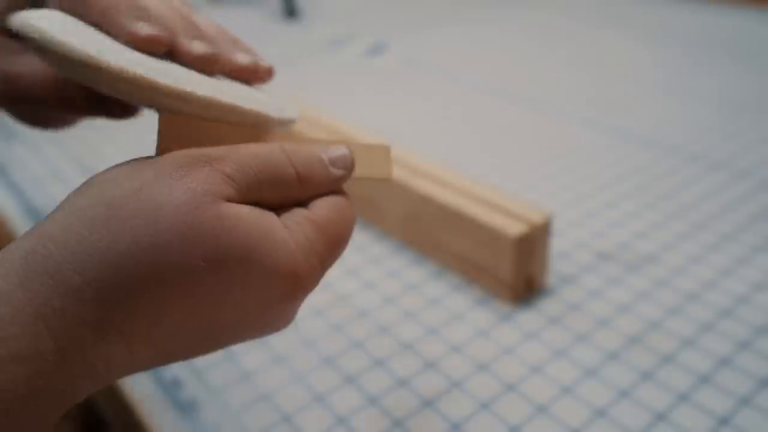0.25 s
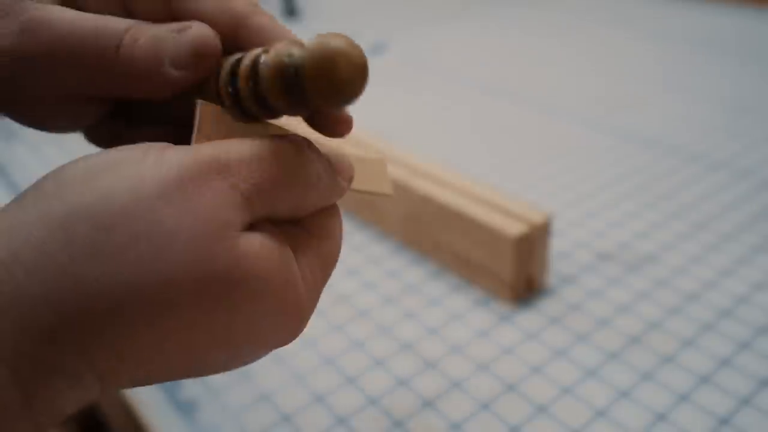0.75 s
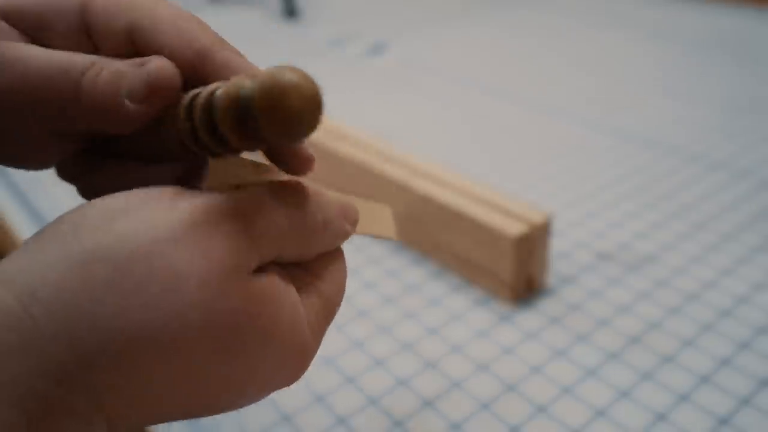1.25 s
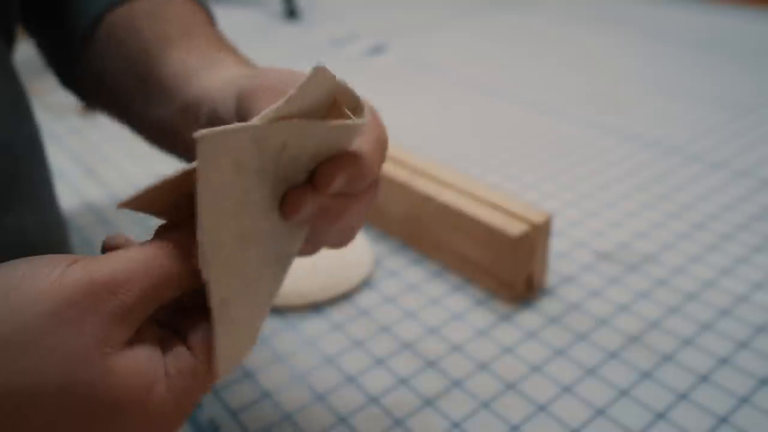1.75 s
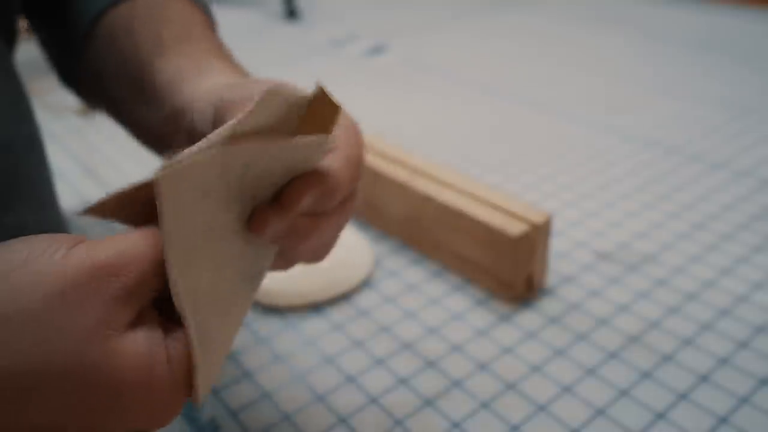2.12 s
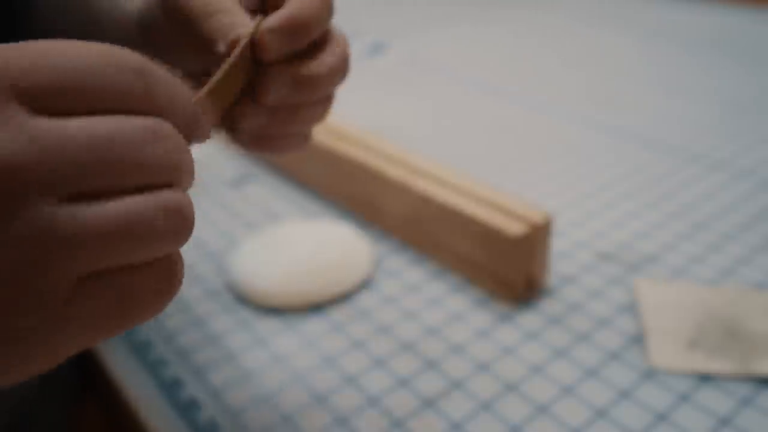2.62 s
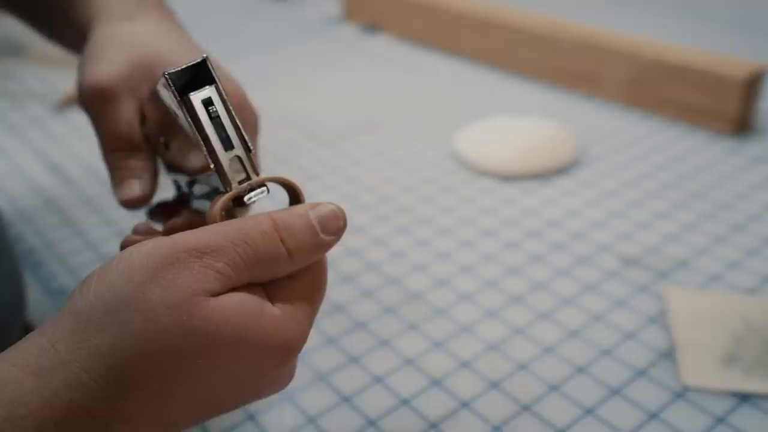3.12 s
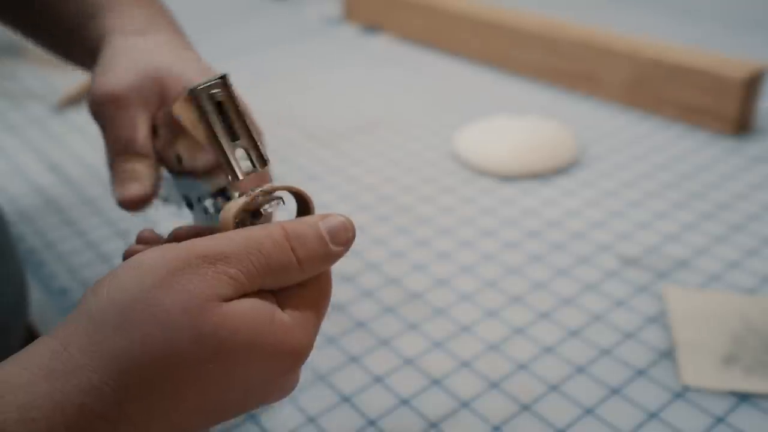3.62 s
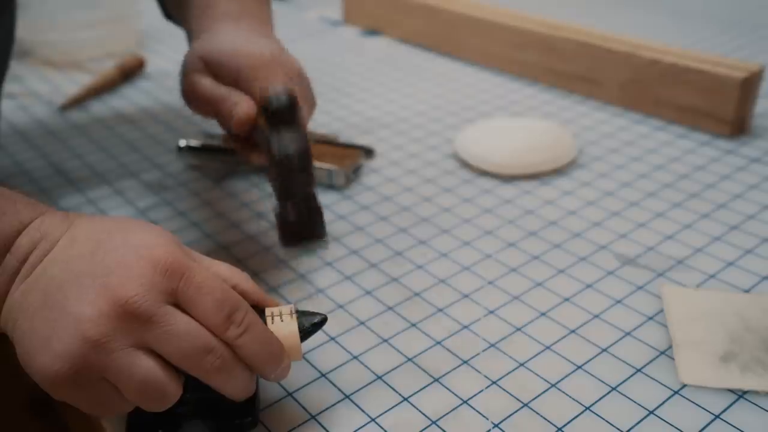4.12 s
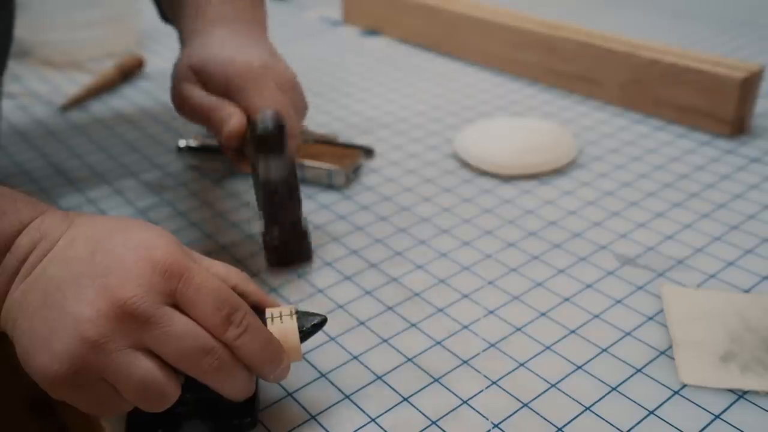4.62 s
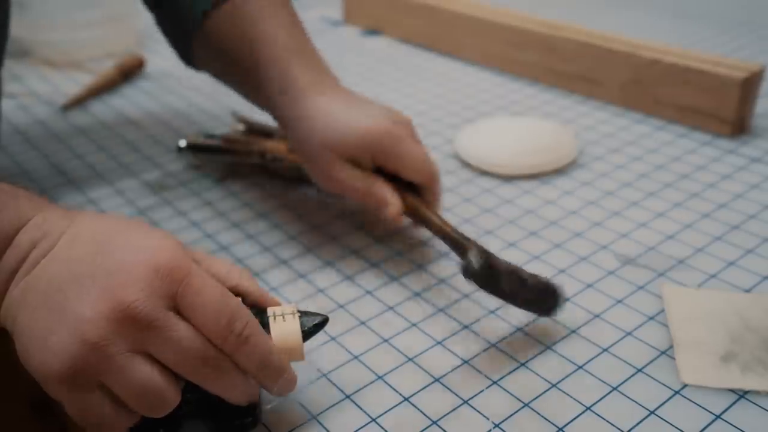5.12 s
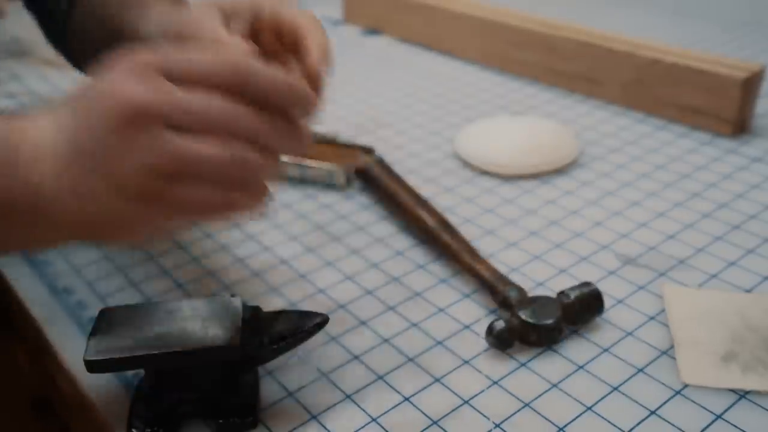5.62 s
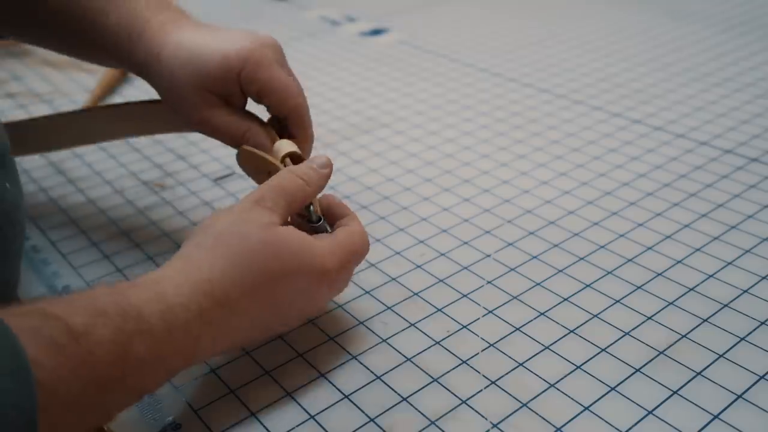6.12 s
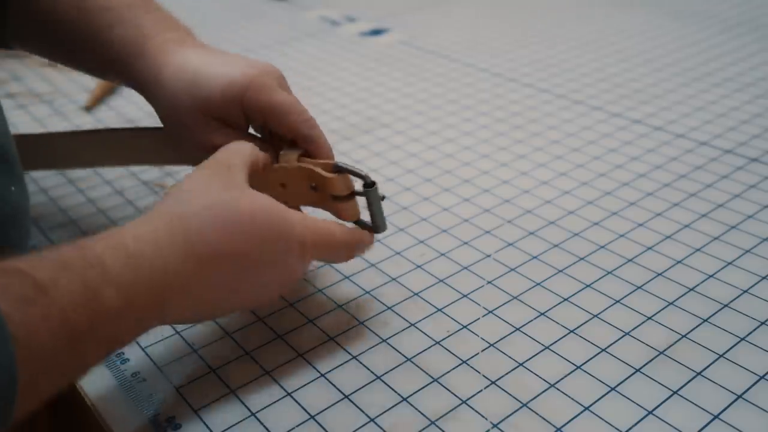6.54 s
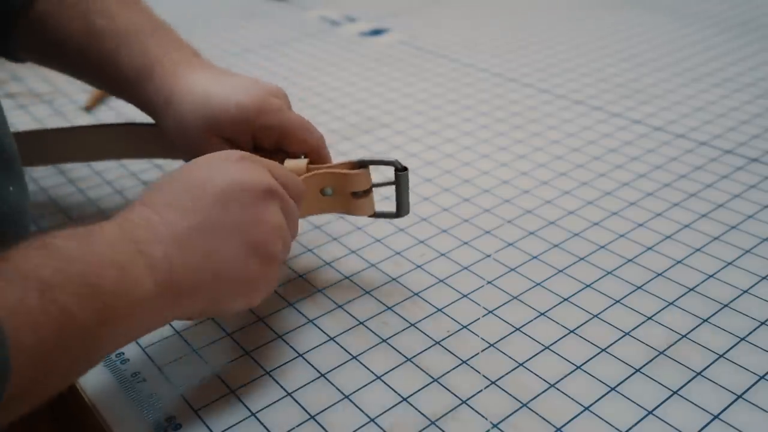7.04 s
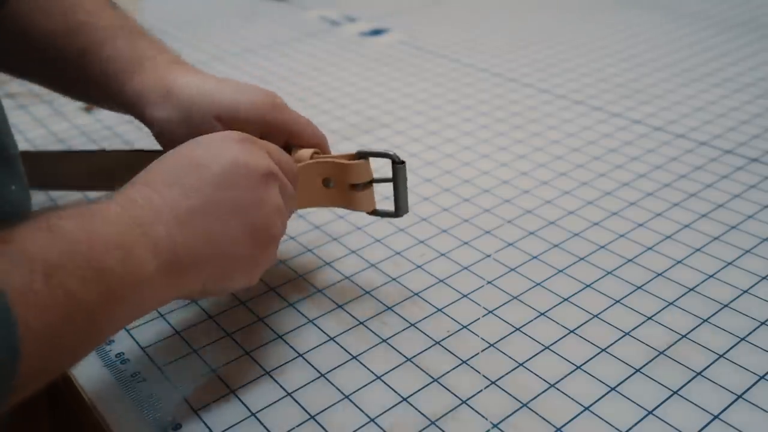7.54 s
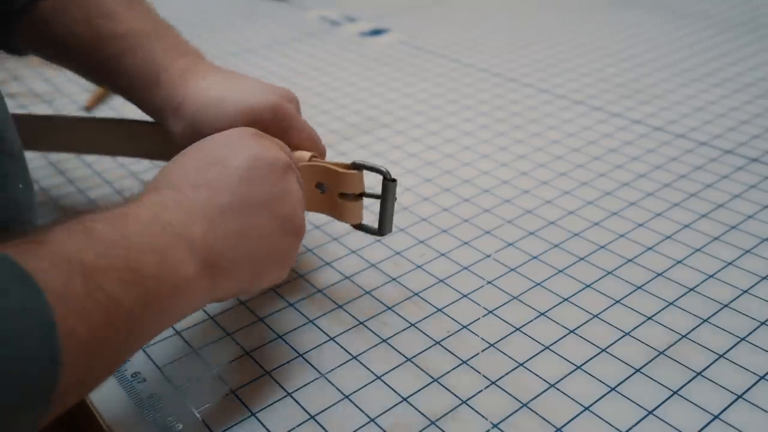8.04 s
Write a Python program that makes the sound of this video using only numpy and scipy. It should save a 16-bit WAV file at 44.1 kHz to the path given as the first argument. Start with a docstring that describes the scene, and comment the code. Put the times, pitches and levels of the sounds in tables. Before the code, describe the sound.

A faint, dull ventilation hush with a slight fan whine runs throughout, heard close up in a small, live workshop. From about 0.6 to 1.5 seconds a wooden tool taps lightly on a leather edge. Six soft, quick rubbing strokes rasp between 1.6 and 2.4 seconds, followed by a faint finger slide and another tap. A steel stapler clacks sharply at 3.2, 3.5 and 3.7 seconds, its spring faintly ringing. From 4.0 to 4.8 come four loud, evenly spaced hammer blows on an anvil, each a steel crack with a booming bench, the third hardest. At 5.3 the hammer thuds down, its wooden handle clattering until 5.6. The strap creaks briefly at 6 and 7 seconds amid soft finger slides. A metal buckle clinks lightly from 6 to 8 seconds, ringing at 6.3, with a soft knock and brighter rattle around 7.8.

```python
"""Soft rubbing on a leather belt's edge, with light taps of a wooden burnisher, in a small, live workshop.
A steel stapler snaps on the keeper loop, then four hammer blows flatten the staples on an anvil and set
the bench booming. Tools knock as they are put down, the strap creaks, and the buckle's prong and roller
clink in the hands. The rubbing is fibres catching and slipping; the strikes are noise bursts and ringing
modes. Dull ventilation with a faint fan whine runs underneath."""
import sys
import numpy as np
from scipy import signal
from scipy.fft import rfft, irfft, next_fast_len
from scipy.io import wavfile

SR = 44100
rng = np.random.default_rng(int(sys.argv[2]) if len(sys.argv) > 2 else 0)


def log_audio(samples):
    """Write samples as a 16-bit WAV file to the path given in sys.argv[1]."""
    # one column per channel
    frames = np.atleast_2d(samples).T
    # limit to full scale, then quantise
    limited = np.clip(frames, -1, 1)
    pcm = np.round(limited * 32767).astype(np.int16)
    wavfile.write(sys.argv[1], SR, pcm)


N = 364839
AGE = np.arange(32768) / SR   # seconds since a strike


# Hammer blows. Each row: time in seconds, thud level in dB, tilt in dB per octave, tick level in dB,
# pitch of the contact in Hz.
BLOWS = [(4.0125, 3, -2, 3, 8100), (4.2887, 4.5, 0.24, 4, 9940), (4.546, 7, 2.5, 14.5, 5195),
         (4.830, 2, -1, -0.5, 8200)]
# Hammer head and anvil ring briefly; the last row is the buckle's thin, high ring, set off by each blow.
# Each row: pitch in Hz, level in dB, t60 in seconds.
METAL_MODES = [(1310, -1, 0.014), (3000, -2.5, 0.0072), (7460, -6.5, 0.0037), (12700, -13.5, 0.012),
               (3620, -11, 0.0099), (13630, -46, .25)]
# The dull weight of a hit on the bench. Each row: frequency in Hz, level in dB.
THUD_EQ = [(25, -49), (60, -16.5), (100, -1), (250, 0), (420, 1), (750, -1.5), (1300, -9.5), (2100, -20.5),
           (3700, -22.5), (6000, -40), (16000, -70)]

def hammering():
    """Steel cracks on the staple, the buckle rings in sympathy, and the anvil sets the bench booming."""
    booms, ticks = np.zeros((2, N))
    tick_lead_s, crack_db, crack_t60_s = .0005, 10, 0.0013
    for s, db, tilt_db, tick_db, contact_hz in BLOWS:
        push = from_db(db) * peak_one(colour(1. * (AGE == 0), THUD_EQ, tilt_db))
        add(booms, s, room(push, wet_db=5, build_s=0.046) + bench(push, ring_scale=0.94))
        metal = ring(METAL_MODES + [(contact_hz, crack_db, crack_t60_s)], spread_db=5.0)
        tick = peak_one(metal + 1.6 * burst(t60=0.0074))
        add(ticks, s - tick_lead_s, from_db(tick_db) * room(tick, wet_db=-13.5, build_s=0.053))
    return booms + butterworth(ticks, "low", hz=12000, order=3)


# The bench top's boom. Each row: pitch in Hz, level in dB.
BENCH_MODES = [(104, -54), (125, -53), (180, -52), (238.2, -50.5), (303, -52.5), (435, -51.5), (572, -52.5),
               (757, -52.5), (845, -54), (1052, -55.5), (1175, -56), (1404, -55)]

def bench(push, ring_scale):
    """The ring swells as a push spreads through the bench top; ring_scale stretches swell and decay."""
    swell_s, t60 = .03 * ring_scale, 0.29 * ring_scale
    swell = np.e * (1 - np.exp(-AGE / swell_s))
    boom = ring([(hz, db, t60) for hz, db in BENCH_MODES], spread_db=1.0)
    return signal.fftconvolve(push, swell * boom)[:len(push)]


# The stapler's lever clacks over. Each row: time in seconds, level in dB, length in seconds,
# relative spring level in dB, resonance of the steel channel in Hz.
LEVER_CLACKS = [(3.2247, -19.5, 0.0058, 5, 3700), (3.4793, -9.5, 0.0056, -5, 3480),
                (3.6606, -13, 0.007, -7.5, 2900)]
# Single latch clicks. Each row: time in seconds, level in dB, length in seconds.
LATCH_CLICKS = [(3.5092, -10.5, 0.00048), (3.631, -24, 0.0012), (3.709, -30, 0.0053)]

def stapler():
    """Each clack is a catch, a snap and a rebound; the latch adds short clicks."""
    out = np.zeros(N)
    for s, db, length_s, spring_db, channel_hz in LEVER_CLACKS:
        add(out, s - 0.0054, snap(db - 21.5, length_s=0.0021))   # the pawl catches
        add(out, s, snap(db, length_s, spring_db, channel_hz))
        add(out, s + 0.012, snap(db - 14.5, length_s=0.007))   # the lever rebounds
    for s, db, length_s in LATCH_CLICKS:
        add(out, s, snap(db, length_s))
    return room(out, wet_db=-8.5, build_s=0.0074)


# The bite of sheet steel. Each row: frequency in Hz, level in dB.
SNAP_EQ = [(150, -34), (850, -22), (1150, -11), (1480, 2), (2200, -13), (2950, 0.5), (3550, 0.5),
           (4500, -3.5), (7500, -4.5), (10000, -4), (13000, -6), (16000, -17)]
# The spring's ping. Each row: pitch in Hz, level in dB, t60 in seconds.
SPRING_MODES = [(1485, -36, .4), (1712, -39, .5), (2767, -41, .25), (3677, -34, .58), (4081, -39, .28),
                (5868, -44, .42), (7472, -53, .5), (8716, -52, .5)]

def snap(db, length_s, spring_db=-8, channel_hz=3500):
    """Sheet-steel parts grind past each other for a few milliseconds and leave the spring ringing."""
    full_snap_db = -11
    tilt_db = 0.27 * (db - full_snap_db)   # softer snaps are duller
    grind = colour(burst(t60=0.012, hold_s=length_s), SNAP_EQ, tilt_db)
    channel = signal.lfilter(*signal.iirpeak(channel_hz, Q=8, fs=SR), grind)
    spring = from_db(spring_db) * ring(SPRING_MODES, spread_db=1.0)
    return from_db(db) * (grind + channel + spring)


# A muffled, echoing rumble just before the first hammer blow; in the later rows, tools and strap land.
# Each row: time in seconds, level in dB, tilt in dB per octave, echo send in dB, lead of the first
# touch in seconds, first bounce's flight in seconds, loss per bounce in dB.
KNOCKS = [(3.957, -34.5, -2, 11.5, .01, 0.019, 25), (5.3336, -1, -0.1, -9.5, 0.034, 0.0088, 14.5),
          (5.5313, -12.5, -1, -5, 0.031, 0.036, 7.5), (5.9, -29, 0, 5, 0.0096, 0.074, 6),
          (7.736, -16, 0, 0, 0.053, .01, 5.5), (7.798, -27, -4, 3.5, 0.016, 0.0086, 21.5),
          (8.225, -34, 6, -3.5, .02, 0.0084, 12.5)]
CONTACT_LEAD_S = 0.0018   # the surfaces tick just before the bench gives

def knocks():
    """A light touch, the main hit and two bounces, as when a thing lands edge first on the cutting mat."""
    out = np.zeros(N)
    edge_db, bounce_shrink = -19.5, 0.55
    for s, db, tilt_db, wet_db, lead, flight, loss_db in KNOCKS:
        direct, diffuse = np.zeros((2, len(AGE)))
        bounces = [(lead + flight, -loss_db), (lead + flight * (1 + bounce_shrink), -2 * loss_db)]
        for delay, soft_db in [(0, edge_db), (lead, 0)] + bounces:
            # a softer touch is duller and more diffuse
            touch = from_db(db + soft_db) * delayed(knock(tilt_db + 0.5 * soft_db), delay)
            direct += touch
            diffuse += touch * from_db(wet_db - 0.74 * soft_db)
        diffuse = butterworth(diffuse, "high", hz=120, order=2)   # light things stir little bass
        sound = direct + bench(direct, ring_scale=0.092) + echo(diffuse, build_s=0.01)
        add(out, s - lead - CONTACT_LEAD_S, sound)
    return butterworth(out, "low", hz=8000, order=3)   # the mat softens the top


def knock(tilt_db):
    """A tick of contact, then a soft push on the bench."""
    push = peak_one(colour((AGE == 0) + .018 * burst(t60=0.16), THUD_EQ, tilt_db))
    tick = from_db(tilt_db - 15.5) * peak_one(burst(t60=0.0079))
    return tick + delayed(push, CONTACT_LEAD_S)


# The hammer's handle settles. Each row: time in seconds, level in dB.
HANDLE_CLACKS = [(5.3005, -37.5), (5.33, -24.5), (5.378, -43), (5.506, -34.5), (5.5303, -12.5),
                 (5.543, -22.5), (5.5704, -21), (5.591, -32)]
# Its woody tone. Each row: frequency in Hz, level in dB.
HANDLE_EQ = [(400, -5), (1200, 15), (2100, -1), (2900, 7.5), (6700, -4), (7800, -17), (16000, -35)]

def handle():
    """The wooden handle clatters in short, hard clacks."""
    out = np.zeros(N)
    for s, db in HANDLE_CLACKS:
        add(out, s, from_db(db) * peak_one(colour(burst(t60=0.013), HANDLE_EQ)))
    return room(out, wet_db=-6.0, build_s=0.0089)


# The prong strikes the buckle's frame. Each row: time in seconds, level in dB, ring time multiplier.
CLINKS = [(6.05, -46.5, 0.27), (6.169, -45, 0.073), (6.3112, -43, 0.99), (6.329, -25.5, 2),
          (6.4443, -33.5, 0.23), (6.5469, -40, 0.44), (6.9052, -41, 0.27), (7.356, -36.5, 0.27),
          (7.4673, -42, .22), (7.484, -35, 0.35), (7.5484, -42, 0.26), (7.6452, -40.5, .22),
          (7.679, -33.5, 0.11), (7.744, -30, 3.2), (7.799, -21.5, 0.46), (7.9545, -22.5, 0.17),
          (8.042, -39, 0.3)]
# The frame's bright ring. Each row: pitch in Hz, level in dB, t60 in seconds.
FRAME_MODES = [(3450, -8, 0.052), (3874, 0.5, 0.12), (3994, 1.5, 0.079), (5270, -4.5, 0.051),
               (13500, -8, 0.067), (14620, -18, 0.051)]
# The prong's click. Each row: frequency in Hz, level in dB.
CLICK_EQ = [(500, -38.5), (2300, -23), (3500, -5.5), (5200, -9.5), (7000, -25.5), (14000, -20.5),
            (16000, -29.5)]
# The loose roller rattles as the buckle lands. Each row: time in seconds, level in dB.
RATTLES = [(7.776, -35), (7.7937, -23), (7.8017, -36)]
# The roller's thin jingle. Each row: pitch in Hz, level in dB, t60 in seconds.
ROLLER_MODES = [(8900, -12, 0.063), (9884, -6, 0.053), (14000, -10, 0.046)]

def buckle():
    """Each touch clicks and rings the frame, more or less damped by fingers; prong and roller chatter."""
    out = np.zeros(N)
    detune = 0.0083
    for s, db, ring_scale in CLINKS:
        tilt_db = rng.normal(0, 4)   # each touch meets the frame differently
        for delay, soft_db in chatter(gap_s=0.009, step_db=-9.5, count=3):
            frame = ring(FRAME_MODES, spread_db=1.5, ring_scale=ring_scale, tilt_db=tilt_db, detune=detune)
            click = colour(burst(t60=0.0084, hold_s=0.0022), CLICK_EQ, tilt_db)
            clink = 0.78 * peak_one(frame) + 1.19 * peak_one(click)
            add(out, s + delay, from_db(db + soft_db) * clink)
    for s, db in RATTLES:
        for delay, soft_db in chatter(gap_s=.003, step_db=-2.5, count=4):
            roller = ring(ROLLER_MODES, spread_db=4.5, detune=detune) + 0.68 * burst(t60=0.012)
            add(out, s + delay, from_db(db + soft_db) * peak_one(roller))
    return room(out, wet_db=-6.5, build_s=0.0049)


# Firm and light strokes along the leather. Each row: start in seconds, end in seconds, level in dB.
STROKES = [(0.261, 0.457, -64.5), (1.577, 1.658, -43), (1.69, 1.838, -56.5), (1.877, 1.988, -44.5),
           (2.019, 2.124, -48), (2.144, 2.245, -42), (2.297, 2.385, -55.5), (5.82, 6.127, -64)]
# Their rasp. Each row: frequency in Hz, level in dB.
STROKE_EQ = [(410, -44), (700, -9), (1050, -8.5), (1420, -1), (1890, -2), (2220, -8.5), (2840, 1),
             (4920, -17), (10100, -23), (16000, -43)]
# Fingers slide over the strap. Each row: start in seconds, end in seconds, level in dB.
SLIDES = [(2.48, 2.516, -59), (2.502, 2.942, -72), (5.39, 5.45, -58), (6.19, 6.74, -64.5),
          (6.66, 6.86, -60.5), (6.8, 7.14, -67.5)]
# The high hiss of leather, also in the taps and creaks. Each row: frequency in Hz, level in dB.
LEATHER_EQ = [(500, -26), (1500, -4), (3700, 3), (5800, -4.5), (6700, 2.5), (7700, -2.5), (11000, -6),
              (16000, -13)]

def rubbing():
    """Tools and fingers rub the strap; skin is a little smoother than a tool."""
    out = np.zeros(N)
    for start, end, db in STROKES:
        add(out, start, friction(end - start, db, STROKE_EQ, tilt_db=3.5, grain=1))
    for start, end, db in SLIDES:
        add(out, start, friction(end - start, db, LEATHER_EQ, tilt_db=0, grain=0.89))
    return room(out, wet_db=-19.5)


def friction(length_s, db, eq, tilt_db, grain):
    """Fibres catch and slip by the thousand; the hand speeds up and slows down within the stroke."""
    count = int(length_s * SR)
    slips_per_s, wavers_per_s = 14000, 30
    grain_db = grain * np.interp(db, [-62, -44], [4.2, 2.1])   # a light touch crackles, a firm one hisses
    slips = rng.standard_normal(count) * (rng.random(count) < slips_per_s / SR)
    slips *= from_db(grain_db * np.minimum(rng.exponential(1, count), 5))
    grip = np.interp(np.arange(count) / SR * wavers_per_s, np.arange(64), rng.standard_normal(64))
    slips *= from_db(0.092 * grain_db * grip)
    speed = np.abs(np.sin(np.linspace(0, np.pi, count))) ** 0.59
    return from_db(db) * speed * colour(slips / slips.std(), eq, tilt_db)


# The burnisher taps the edge as it turns round. Each row: time in seconds, level in dB.
TAPS = [(0.6445, -54), (0.965, -40), (1.05, -45.5), (1.158, -36), (1.25, -43), (1.3826, -34), (1.476, -38),
        (2.365, -36), (3.07, -44)]
# Its hollow ring. Each row: pitch in Hz, level in dB, t60 in seconds.
BURNISHER_MODES = [(1273, -15, .012), (2080, -5.5, 0.015), (3340, 3, 0.013), (5380, 2, 0.0038)]

def burnisher():
    """Light, dead taps of wood on leather."""
    out = np.zeros(N)
    for s, db in TAPS:
        wood = ring(BURNISHER_MODES, spread_db=4.0)
        leather = colour(burst(t60=0.0094), LEATHER_EQ)
        add(out, s, from_db(db) * peak_one(wood + .5 * leather))
    return room(out, wet_db=-12.5)


# The strap creaks. Each row: start in seconds, rough end in seconds, level in dB, tilt in dB per octave.
CREAKS = [(5.98, 6.039, -33.5, -12), (7.032, 7.133, -43, -1)]

def creaking():
    """Bent leather sticks and slips in a short, uneven run."""
    out = np.zeros(N)
    gap_s = .013
    for start, end, db, tilt_db in CREAKS:
        for delay, soft_db in chatter(gap_s, step_db=-1.1, count=round((end - start) / gap_s)):
            gain = from_db(db + soft_db + rng.normal(0, 2.5))
            slip = peak_one(colour(burst(t60=0.0082), LEATHER_EQ, tilt_db))
            add(out, start + delay, gain * slip)
    return room(out, wet_db=-2.5, build_s=0.012)


# The dull bed of moving air. Each row: frequency in Hz, level in dB.
AIR_EQ = [(20, -1.5), (80, -7), (165, 0), (215, -4.5), (268, 1), (310, -6), (900, -12.5), (1100, -17),
          (2400, -21), (3300, -19.5), (4800, -33), (16000, -45)]
# The fan's whine swells and fades. Each row: time in seconds, level in dB.
WHINE_LEVELS = [(0, -91), (0.8, -72.5), (1.8, -83), (2.9, -71.5), (5.6, -76), (6.602, -66.5), (7.6, -75.5)]

def ventilation():
    """Steady air noise with a faint, slightly unsteady fan whine."""
    air = from_db(-58.5) * colour(rng.standard_normal(N), AIR_EQ)
    wander = butterworth(rng.standard_normal(N), "low", hz=4, order=2)
    whine_hz = 925 + 5 * wander / wander.std()
    whine = np.sqrt(2) * np.sin(2 * np.pi * np.cumsum(whine_hz) / SR)
    whine_db = np.interp(np.arange(N) / SR, *np.transpose(WHINE_LEVELS))
    return air + from_db(whine_db) * whine


# The workshop's echo. Each row: band centre in Hz, level in dB, t60 in seconds.
ROOM_BANDS = [(97, -3, 0.53), (254, 6, 0.33), (577, -0.5, 0.56), (1510, 3, 0.52), (3150, 2.5, 0.47),
              (5900, -2, 0.32), (10700, -13, 0.57), (15000, -15.5, 0.24)]

def echo(x, build_s):
    """Diffuse reflections pile up for build_s, then each band dies at its own rate."""
    white = rfft(rng.standard_normal(len(AGE)))
    octave = np.log2(np.maximum(np.arange(len(white)) * SR / len(AGE), 10))
    centres = np.log2([row[0] for row in ROOM_BANDS])
    tail = 0
    for share, (_, db, t60) in zip(np.eye(len(ROOM_BANDS)), ROOM_BANDS):
        band = irfft(white * np.interp(octave, centres, share))
        tail += from_db(db) * band * fade(t60, build_s)
    onset = np.interp(AGE, [.001, .003, .009, .011], [0.16, 0.99, 0.83, 0.78])
    return signal.fftconvolve(x, tail * onset / np.sqrt(SR * (build_s + 0.044)))[:len(x)]


def room(x, wet_db, build_s=0.051):
    """Direct sound plus its echo."""
    return x + from_db(wet_db) * echo(x, build_s)


def ring(modes, spread_db, ring_scale=1, tilt_db=0, detune=0):
    """Struck modes; from hit to hit their levels vary by spread_db, their pitches by the share detune."""
    out = 0
    for k, (hz, db, t60) in enumerate(modes):
        gain = from_db(db + rng.normal(0, spread_db) + tilt_db * np.log2(hz / modes[0][0]))
        pitch_hz = hz * (1 + detune * rng.normal())
        out += gain * (-1) ** k * np.sin(2 * np.pi * pitch_hz * AGE) * fade(t60 * ring_scale)
    return out


def chatter(gap_s, step_db, count):
    """Unevenly spaced touches, each weaker than the last, as pairs of delay in seconds and level in dB."""
    gaps = gap_s * (.5 + rng.random(count))
    return zip(np.cumsum(gaps) - gaps[0], step_db * np.arange(count))


def burst(t60, hold_s=0):
    """A dying cluster of tiny contacts."""
    return rng.standard_normal(len(AGE)) * fade(t60, hold_s)


def fade(t60, hold_s=0):
    """Holds at 1, then dies by 60 dB in t60 seconds."""
    return np.exp(-np.minimum(np.log(1000) * np.maximum(AGE - hold_s, 0) / t60, 20))


def colour(x, eq, tilt_db=0):
    """Minimum-phase EQ, tilted by tilt_db per octave; white noise keeps its power."""
    size = next_fast_len(len(x) // 2 + 1) * 2
    octave = np.log2(np.maximum(np.arange(size // 2 + 1) * SR / size, 10))
    hz, db = np.transpose(eq)
    gain = from_db(np.interp(octave, np.log2(hz), db + tilt_db * np.log2(hz)))
    cepstrum = irfft(np.log(gain / np.sqrt(np.mean(gain ** 2))))
    cepstrum[1:size // 2] *= 2
    cepstrum[size // 2 + 1:] = 0
    return irfft(rfft(x, size) * np.exp(rfft(cepstrum)))[:len(x)]


def butterworth(x, kind, hz, order):
    """Smooth low-pass or high-pass."""
    return signal.sosfilt(signal.butter(order, hz, kind, fs=SR, output="sos"), x)


def delayed(hit, s):
    """Slide a hit s seconds later."""
    return np.interp(AGE - s, AGE, hit, left=0)


def from_db(db):
    """Decibels to gain."""
    return 10 ** (np.asarray(db) / 20)


def peak_one(x):
    """Scale to a peak of 1."""
    return x / np.abs(x).max()


def add(track, s, sound):
    """Mix a sound into the track at s seconds."""
    start = max(0, round(s * SR))
    track[start:start + len(sound)] += sound[:max(0, N - start)]


def scene():
    """All the work at the bench, close up and in mono."""
    work = rubbing() + burnisher() + stapler() + hammering() + knocks() + handle() + creaking()
    return (work + buckle() + ventilation())[None]


def record(dry):
    """The loudest peaks overload and clip softly; rumble and the very top are cut."""
    clipped = dry / (1 + (np.abs(dry) / .8) ** 6) ** (1 / 6)
    clipped = butterworth(clipped, "high", hz=16, order=1)
    top_hz = 15900
    return signal.sosfilt(signal.ellip(8, .3, 90, top_hz, fs=SR, output="sos"), clipped)


dry = scene()
out = record(dry)
log_audio(out)
```